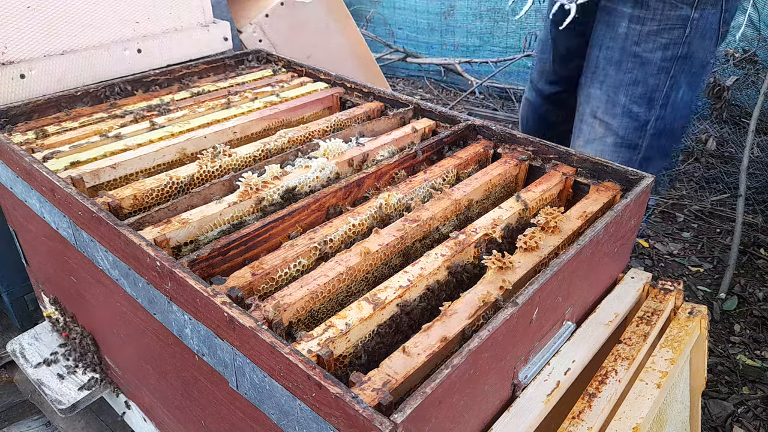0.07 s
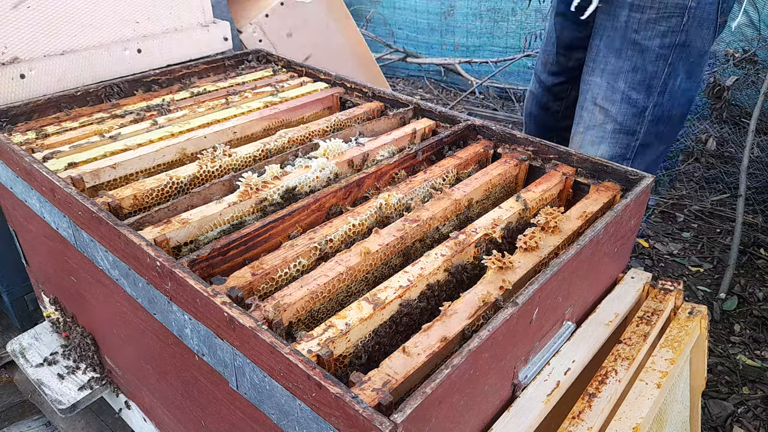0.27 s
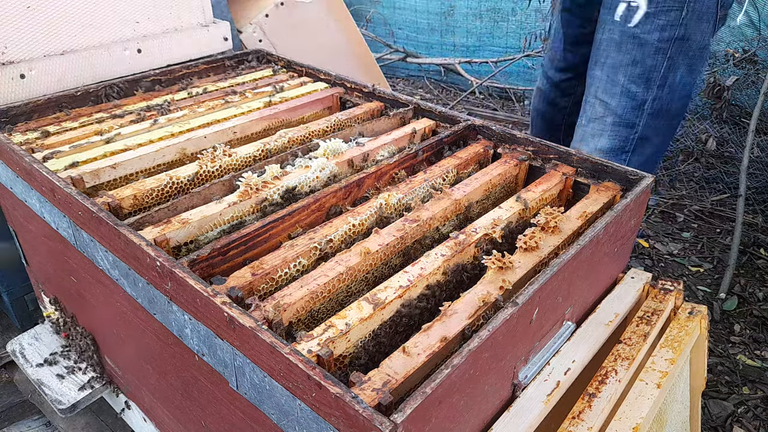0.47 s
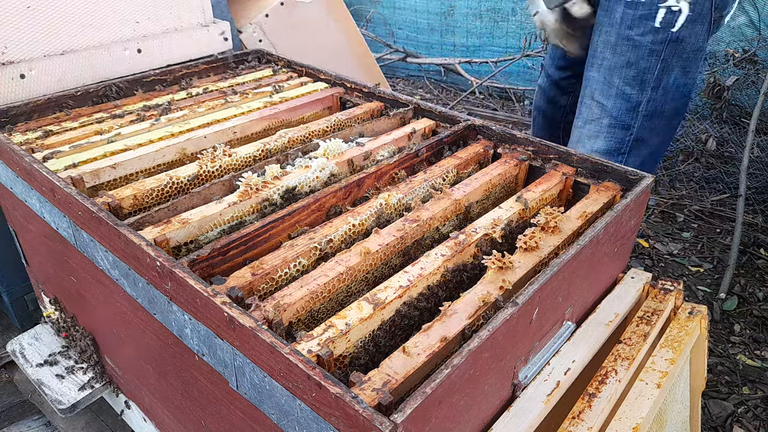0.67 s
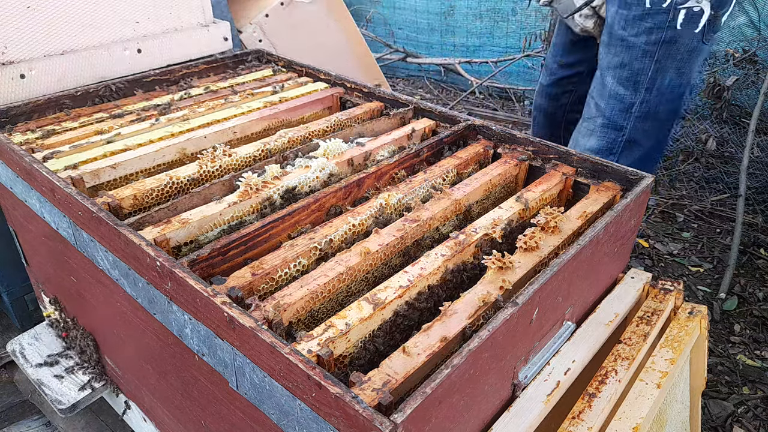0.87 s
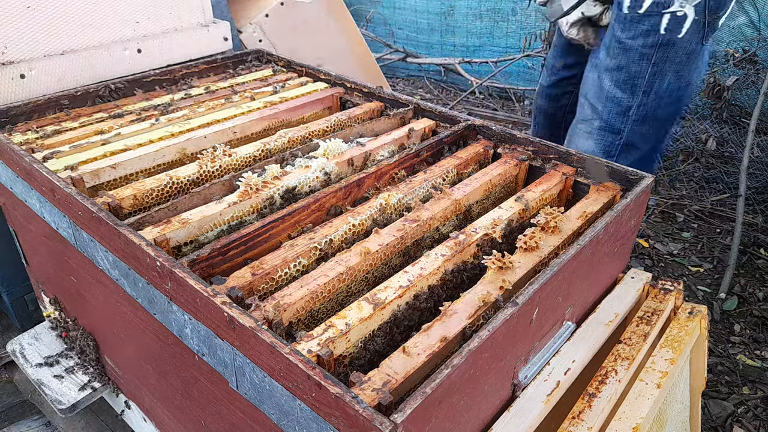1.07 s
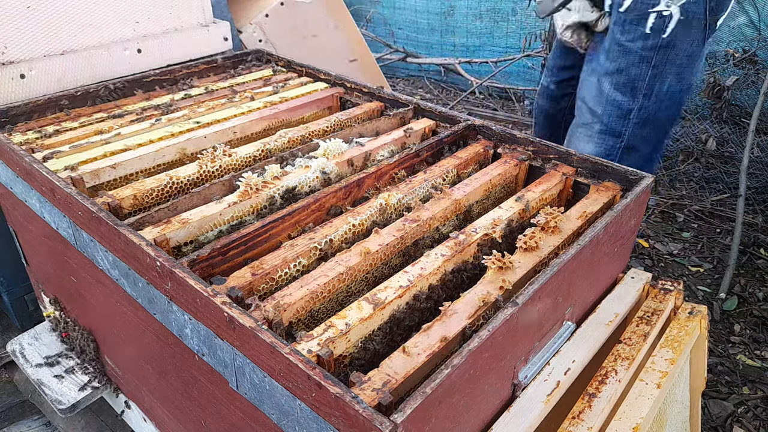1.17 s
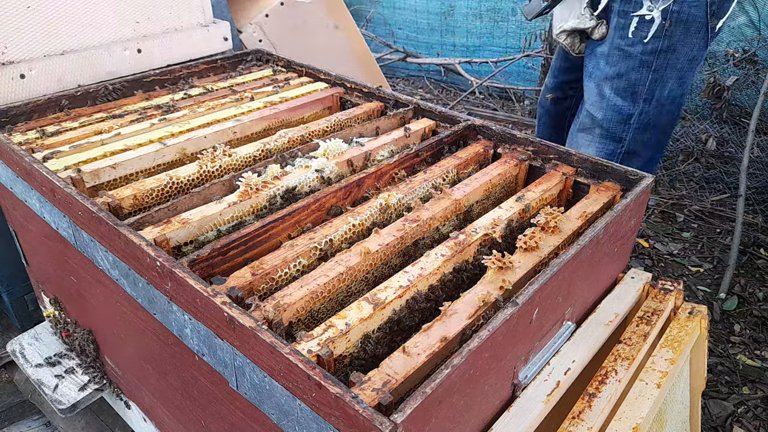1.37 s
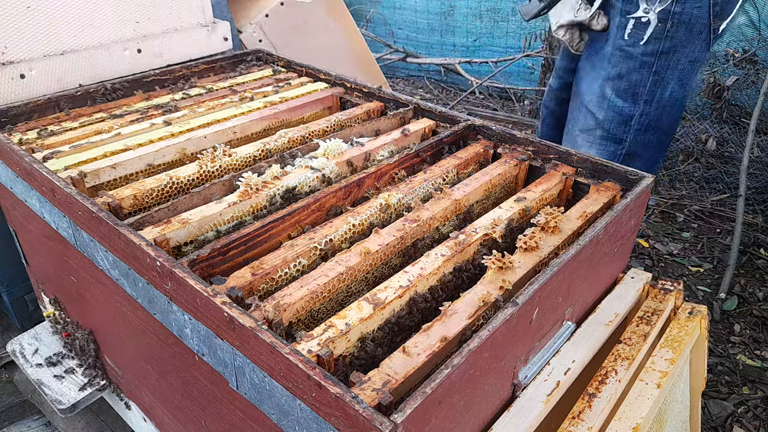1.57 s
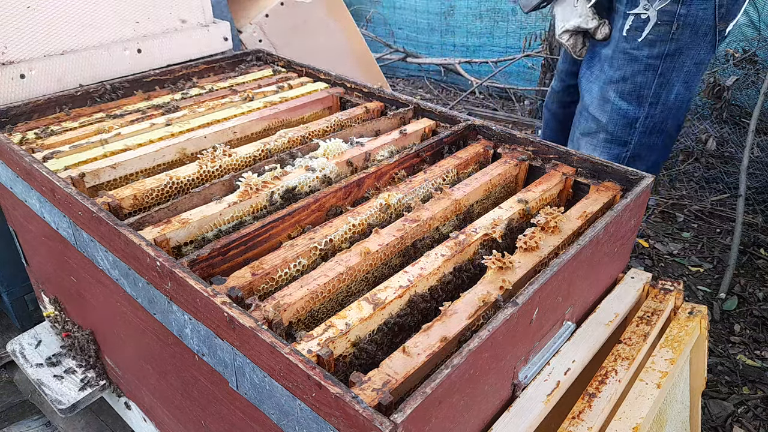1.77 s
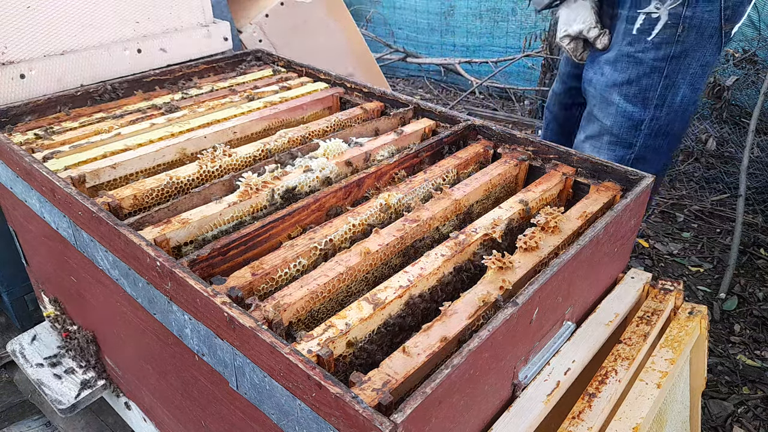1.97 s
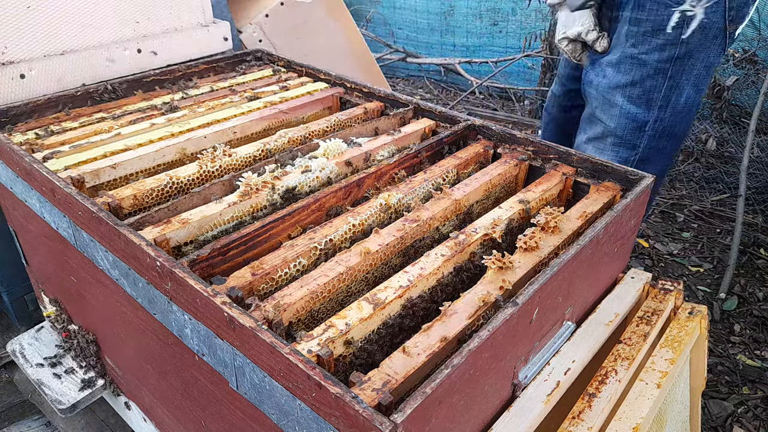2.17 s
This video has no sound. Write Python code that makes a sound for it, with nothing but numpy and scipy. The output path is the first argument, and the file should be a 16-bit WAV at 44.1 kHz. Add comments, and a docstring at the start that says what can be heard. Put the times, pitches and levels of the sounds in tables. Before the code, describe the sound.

A bee buzzes right past the left microphone, its wingbeats briefly buffeting it, just after a light click. Then the open hive's soft outdoor hum remains, slowly swelling, with faint chirps from a distant bird.

```python
"""Outdoors at an open wooden hive, honey bees hum with their beating wings. One bee hovers by
the left microphone, darts past so close that each wingbeat puffs air on it, and flies off.
Something small clicks against the hive and rings briefly, and a far bird chirps. The hum of
the colony, many wingbeat tones over soft noise, slowly swells."""
import sys
import numpy as np
from scipy import signal
from scipy.fft import rfft, irfft
from scipy.io import wavfile

SR = 44100
rng = np.random.default_rng(int(sys.argv[2]) if len(sys.argv) > 2 else 0)


def to_wav(sig):
    """Store sig (one row per channel, or 1-D mono) as 16-bit WAV at the path in sys.argv[1].

    Samples outside -1..1 are clipped; the rate is SR.
    """
    pcm = np.clip(np.atleast_2d(sig), -1, 1) * 32767
    pcm = np.round(pcm).astype(np.int16)
    wavfile.write(sys.argv[1], SR, pcm.T)  # frames by channels


N = 97020
T = np.arange(N) / SR
CLOSEST_S = .2341   # the bee is nearest; a wingbeat starts here
GUST_S, GUST_SPREAD_S = .222, .016   # its air stream shakes the microphone


def near_bee(count=48):
    """Beating wings make a buzz and a hiss; up close the overtones line up into a sharp sawtooth."""
    # wingbeat rate: t/s, f/Hz
    wingbeat = [(0, 209.5), (.06, 215.2), (.118, 219), (.165, 227.8), (.192, 234.3), (.23, 237.9),
                (.243, 213.3), (.253, 203), (.275, 214.5), (.33, 223), (.375, 227.8), (.43, 217),
                (.9, 213.1), (.98, 222.7)]
    # loudness of the buzz: t/s, lowest tone/dB, octave above/dB, higher overtones/dB
    buzz = [(0, -27.5, -35, -44.5), (.03, -41.5, -33, -42.5), (.075, -32, -36.5, -48),
            (.118, -55, -34, -44), (.176, -43, -34, -44.5), (.198, -16.5, -22.5, -29.5),
            (.213, -1.5, -11, -17), (.224, -9.5, -6, -9.5), (.24, -9, -27, -32), (.253, -46, -12, -23.5),
            (.259, -24, -27, -41), (.318, -39, -44, -51), (.365, -45.5, -53.5, -58.5),
            (.412, -41, -45, -59), (.45, -61.5, -73.5, -74.5), (.6, -77.5, -79.5, -82),
            (.88, -86, -62.5, -78), (.97, -52, -65.5, -68), (1.04, -85, -77, -86.5)]
    # balance of the higher overtones: f/Hz, level/dB
    overtones = [(660, 0.5), (880, -5.5), (1070, -0.5), (1160, 1), (1330, -13), (1550, -11.5), (1780, -8.5),
                 (2200, -10), (2420, -16), (2700, -13.5), (3150, -21.5), (3800, -18), (6500, -24.5),
                 (15000, -34.5)]
    # brightness above 1 kHz, duller as the bee faces away: t/s, tilt/(dB per octave)
    brightness = [(.17, -2), (.2, -6), (.214, -9.5), (.223, -2), (.24, 1.5), (.252, -8), (.285, -4),
                  (.9, 0)]
    # tone colour of the wing hiss: f/Hz, level/dB
    wing_hiss = [(50, 4), (110, 3), (300, -5), (1000, -5.5), (2500, -12.5), (6000, -11.5), (15000, -13.5)]
    # the right side compared with the left: t/s, level/dB
    right_side = [(0, -29), (.12, -28), (.175, -20.5), (.2, -35.5), (.225, -66), (.255, -55), (.3, -32.5),
                  (.42, -39), (.6, -18.5)]
    hz = in_time(wingbeat)[0] + .51 * drift(30)
    beats = np.cumsum(hz) / SR
    beats -= np.interp(CLOSEST_S, T, beats)
    # no two strokes have quite the same timing or strength
    beats += (.006 + .027 * swell(GUST_S, GUST_SPREAD_S)) * drift(110)
    phase = 2 * np.pi * beats
    first_db, octave_db, upper_db = in_time(buzz)
    tilt, = in_time(brightness)
    scatter = 1 - swell(CLOSEST_S, .035)   # at 0 the overtones line up
    upper = 0
    for k in range(3, count):
        flicker_db = 3.5 * drift(24)
        gain = at_hz(overtones, k * hz) * from_db(flicker_db + tilt * np.log2(max(k / 5, 1)))
        upper += gain * np.sin(k * phase + scatter * rng.uniform(-np.pi, np.pi))
    # the lowest tone shifts half a cycle as the bee crosses the microphone
    flip = np.pi / 2 * np.tanh((T - .218) / .018)
    tone = from_db(first_db) * np.sin(phase - flip) + from_db(octave_db) * np.sin(2 * phase)
    tone += from_db(upper_db) * unit_power(upper)
    hiss_db = np.minimum(upper_db, -31.5) - 12 + .8 * tilt
    hiss = from_db(hiss_db) * unit_power(noise(wing_hiss) * (1 + .5 * np.cos(phase)))
    strength = 1 + .07 * drift(110)
    return on_left(hiss - tone * strength + wing_wind(beats, hz), in_time(right_side)[0])


def wing_wind(beats, hz):
    """Up close, each wing stroke throws a puff and swirls of air over a gust; a low wake follows."""
    # puffs of the two strokes: loudest at t/s, spread/s, place in the beat/0-1, width/s, height
    puffs = [(.228, .0075, .06, .0001, -.75), (.2415, .0105, .21, .000125, 1.0)]
    # tone colour of the swirls: f/Hz, level/dB
    swirl_colour = [(300, -8), (1500, 5.5), (4000, -0.5), (6500, -15), (9000, -24), (12000, -16.5),
                    (15000, -20)]
    # tone colour of the gust: f/Hz, level/dB
    gust_colour = [(35, -24), (70, -2), (140, 4), (330, -3), (800, -5), (1400, -4), (2500, -25.5),
                   (6000, -51)]
    # tone colour of the air left behind the bee: f/Hz, level/dB
    wake_colour = [(30, -19), (52, -5.5), (90, -7), (160, -21), (500, -55.5), (2000, -90)]
    widen = 1 + np.minimum(((T - CLOSEST_S) / .015) ** 2, 2)   # puffs are sharpest up close
    roundness = 1.7   # 1 is a spike, 2 a bell
    stream = 0
    for s, spread, place, width, height in puffs:
        away_s = ((beats - place + .5) % 1 - .5) / hz
        puff = np.exp(-(np.abs(away_s) / (width * widen)) ** roundness)
        average = np.sqrt(np.pi) * width * widen * hz
        stream += height * swell(s, spread) * (puff - average)
    pulse = unit_power(np.exp(4 * np.cos(2 * np.pi * (beats - .1))))   # once a wingbeat
    stream += from_db(-20) * swell(.2304, .008) * pulse * unit_power(noise(swirl_colour))
    gust = unit_power(np.sqrt(pulse) * noise(gust_colour))
    stream += from_db(-14) * swell(GUST_S, GUST_SPREAD_S) * gust
    arrives_s, leaves_s = .2193, .2565
    on_microphone = .5 * (np.tanh((T - arrives_s) / .0018) - np.tanh((T - leaves_s) / .001))
    wake = from_db(-39) * swell(.268, .017) * unit_power(noise(wake_colour))
    return on_microphone * stream + wake


def colony(count=16, order=11):
    """Many bees, each on its own wandering pitch and coming and going, over a blurred hum."""
    # loudness of the hum: t/s, level/dB
    loudness = [(0, -51.5), (.19, -53), (.23, -78), (.32, -63.5), (.5, -64.5), (.58, -69), (1.3, -68.5),
                (1.5, -64.5), (1.67, -61), (1.78, -62), (1.98, -59), (2.08, -60), (2.2, -57.5)]
    # balance of each bee's tones: f/Hz, level/dB
    bee_colour = [(200, -11), (300, -10), (400, -1), (510, 3), (620, -13), (1100, -12.5), (2000, -23),
                  (3500, -33.5)]
    # tone colour of the blurred hum and open air: f/Hz, left level/dB, right level/dB
    air = [(35.2, -22, -19.5), (98, -7, -10.5), (222, -9, -12), (297, -5.5, -8), (380, 0.5, -3),
           (490, 1, -4.5), (594, -6.5, -10.5), (1200, -7.5, -19.5), (2200, -15.5, -37), (3960, -18.5, -39),
           (5850, -19, -38.5), (10100, -26.5, -32.5), (15100, -25.5, -36)]
    slow_hz, fast_hz = 201, 250   # wingbeats gather around these two rates
    swarm = np.zeros((2, N))
    for bee, detune in enumerate(np.linspace(-.06, .06, count)):
        hz = (fast_hz if bee % 2 else slow_hz) * np.exp(detune)
        beats = np.cumsum(hz * (1 + .025 * drift(2.4))) / SR + rng.random()
        right_lead_s = rng.uniform(.00022, .00042) * rng.normal()
        phase = 2 * np.pi * np.array([beats, beats + hz * right_lead_s])
        gain = from_db(4.5 * drift(2.8))
        for k in range(1, order):
            swarm += gain * at_hz(bee_colour, k * hz) * np.sin(k * phase + rng.uniform(0, 2 * np.pi))
    blur = unit_power(np.array([noise(np.array(air)[:, [0, side]]) for side in (1, 2)]))
    sides = from_db([-1, -3.5])[:, None]   # left, right
    return from_db(in_time(loudness)[0]) * (sides * unit_power(swarm) + blur)


def click():
    """A light, hard knock: each touch cracks and rings briefly, and a fine crackle trails off."""
    # the click, its bounces and two faint later touches: t/s, level/dB
    touches = [(0.0739, -23), (0.0759, -30.5), (.0815, -36), (.086, -30), (.094, -33.5), (.135, -41),
               (0.172, -32.5)]
    # ringing tones of a touch: f/Hz, relative level/dB, time to fade by 60 dB/s
    ring_tones = [(1130, -10, .03), (1450, -16, .025), (2347, -12, .07), (3435, -22, .025),
                  (4129, -19, .025), (4705, -21, .025), (5550, -18, .025)]
    # tone colour of the crack: f/Hz, level/dB
    crack_colour = [(150, -32), (600, -9), (1300, 8.5), (3000, -14.5), (5000, -6), (7000, -10.5),
                    (10000, -12), (15000, -13)]
    # tone colour of the crackle: f/Hz, level/dB
    crackle_colour = [(1000, -25.5), (2300, -2), (5300, -2.5), (7000, -11.5), (15000, -19)]
    crack_fade_s, crackle_fade_s = .0092, .19
    crack = from_db(-6) * unit_power(noise(crack_colour))
    out = 0
    for s, db in touches:
        age = np.maximum(T - s, 0)
        touch = crack * from_db(-60 * age / crack_fade_s)
        for hz, level, fade_s in ring_tones:
            gain = from_db(level + rng.normal(0, 1.7) - 60 * age / fade_s)
            touch += gain * np.sin(2 * np.pi * hz * age)
        out += from_db(db) * (T > s) * touch
    age = np.maximum(T - touches[0][0], 0)
    crackle = unit_power(noise(crackle_colour) * from_db(3.5 * drift(400)))
    out += (age > 0) * from_db(-42 - 60 * age / crackle_fade_s) * crackle
    return on_left(out, right_db=-15)


def drone():
    """The low, blurred part of the colony's hum, mostly alike on both sides."""
    # loudness of the drone: t/s, level/dB
    loudness = [(0, -81), (.5, -77), (1.3, -88.5), (1.55, -78), (1.59, -69.5), (1.78, -66), (1.9, -72),
                (2.2, -69)]
    # its tone colour: f/Hz, level/dB
    colour = [(35, -15), (90, -6), (170, -4.5), (240, 2), (300, -10.5), (420, -11), (700, -37)]
    shared = noise(colour)
    sides = np.array([shared + .55 * noise(colour) for _ in range(2)])
    return from_db(in_time(loudness)[0]) * unit_power(sides)


def whine():
    """One high, wavering overtone of a farther bee stands out of the hum."""
    # pitch and loudness of the whine: t/s, f/Hz, level/dB
    curve = [(.62, 1064, -96), (.72, 1061, -77.5), (.84, 1093, -73), (.91, 1060, -71.5), (.98, 1104, -71),
             (1.03, 1090, -95.5), (1.2, 1074, -78), (1.28, 1027, -77.5), (1.36, 1030, -100)]
    hz, db = in_time(curve)
    phase = 2 * np.pi * np.cumsum(hz + 9 * drift(25)) / SR
    return on_left(from_db(db) * np.sin(phase), right_db=-11.5)


def bird():
    """A far bird's trembling, mostly falling notes, each trailed by a soft echo through the trees."""
    # chirps: middle t/s, length/s, start f/Hz, end f/Hz, pitch blur/Hz, level/dB
    chirps = [(.603, .036, 4130, 3780, 140, -77.5), (.66, .036, 3070, 3010, 220, -79),
              (.725, .036, 4800, 4350, 550, -76), (.749, .048, 3550, 3450, 340, -75),
              (.813, .08, 3680, 2970, 450, -79), (1.778, .03, 2770, 2650, 170, -69),
              (1.845, .05, 4700, 5100, 500, -74), (1.87, .04, 3950, 3600, 400, -66),
              (1.937, .048, 4600, 4200, 750, -65), (1.99, .08, 3490, 3290, 500, -70)]
    out = 0
    for s, length, start_hz, end_hz, blur_hz, db in chirps:
        hz = np.interp(T, [s - length / 2, s + length / 2], [start_hz, end_hz])
        phase = 2 * np.pi * np.cumsum(hz + .55 * blur_hz * drift(260)) / SR
        note = swell(s, length * .42) * np.sin(phase)
        blurred = drift(blur_hz) * np.sin(phase) + drift(blur_hz) * np.cos(phase)
        echo = from_db(-1) * swell(s + .006, length * .69) * blurred
        out += from_db(db) * (note + echo)
    return on_left(out, right_db=-21)


def from_db(db):
    """Turn decibels into a multiplier."""
    return 10 ** (np.asarray(db) / 20)


def unit_power(x):
    """Scale a signal to an average power of 1."""
    return x / np.sqrt(np.mean(x ** 2) + 1e-20)


def in_time(rows):
    """Draw each column of a time table as a line through every sample."""
    s, *columns = np.transpose(rows)
    return [np.interp(T, s, c) for c in columns]


def at_hz(colour, hz):
    """How strong a tone colour is at the given frequencies, as a multiplier."""
    points_hz, db = np.transpose(colour)
    return from_db(np.interp(np.log(hz + 1e-9), np.log(points_hz), db))


def drift(rate_hz):
    """Random wandering of typical size 1, mostly slower than the given rate."""
    hz = np.arange(N // 2 + 1) * SR / N
    return unit_power(irfft(rfft(rng.standard_normal(N)) / (1 + (hz / rate_hz) ** 2), N))


def noise(colour):
    """Noise with a given tone colour and no deep rumble."""
    hz = np.arange(N // 2 + 1) * SR / N
    return irfft(rfft(rng.standard_normal(N)) * at_hz(colour, hz) * (hz > 28), N)


def swell(peak_s, spread_s):
    """A bell-shaped rise and fall."""
    return np.exp(-.5 * ((T - peak_s) / spread_s) ** 2)


def on_left(x, right_db):
    """Put a sound on the left, weaker on the right."""
    return np.array([x, x * from_db(right_db)])


def scene():
    """The near bee, the hum of the hive, the bird and the click, all together."""
    return near_bee() + colony() + drone() + whine() + bird() + click()


def record(dry):
    """Loud peaks overload, the microphone has two dips in the treble, and the very top is cut."""
    heard = np.clip(dry, -.95, .95)
    dip_gain, cutoff_hz = from_db(-9), 15800
    for dip_hz in (7650, 8900):
        b, a = signal.iirnotch(dip_hz, Q=3.2, fs=SR)
        heard = dip_gain * heard + (1 - dip_gain) * signal.lfilter(b, a, heard)
    return signal.sosfilt(signal.ellip(12, .1, 80, cutoff_hz, fs=SR, output="sos"), heard)


dry = scene()
out = record(dry)
to_wav(out)
```